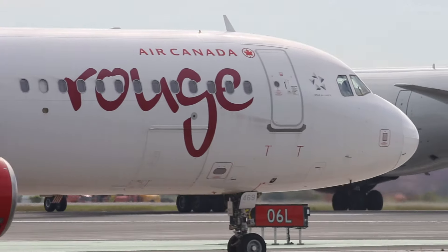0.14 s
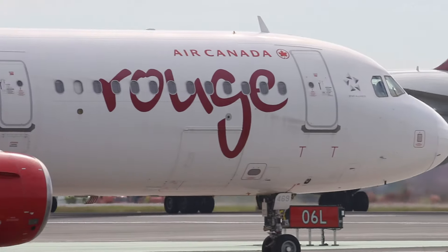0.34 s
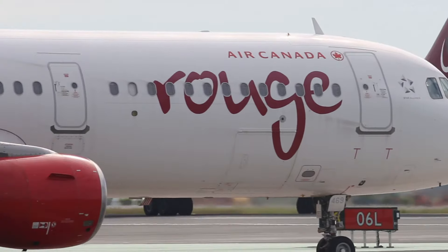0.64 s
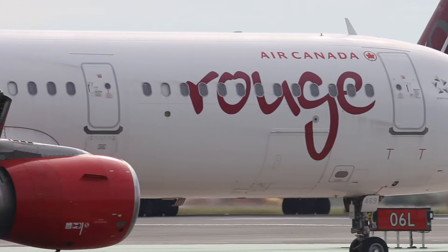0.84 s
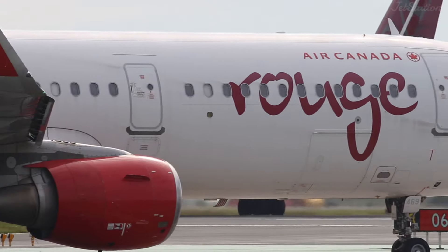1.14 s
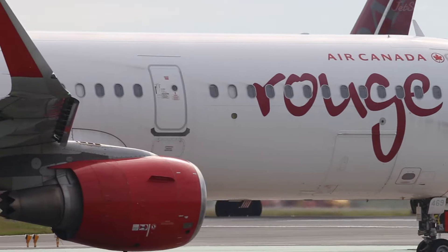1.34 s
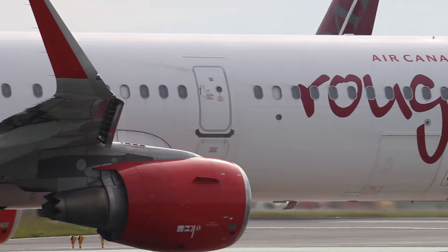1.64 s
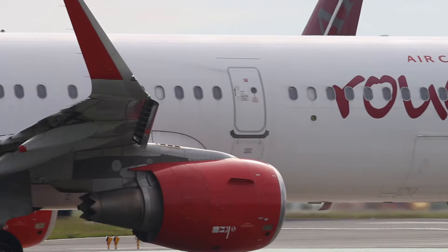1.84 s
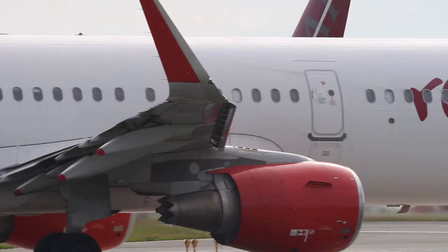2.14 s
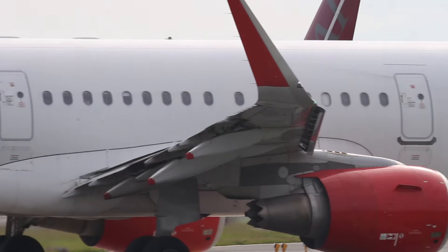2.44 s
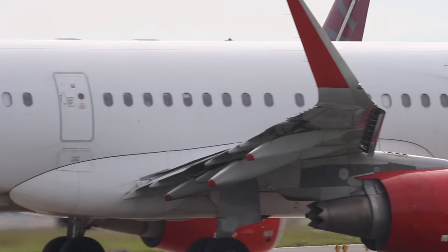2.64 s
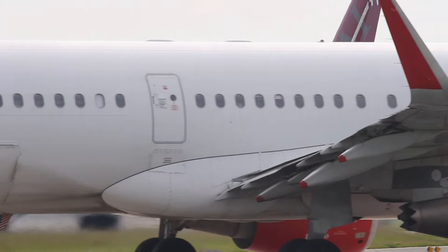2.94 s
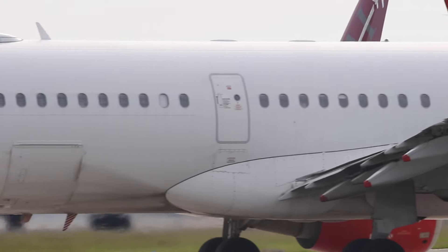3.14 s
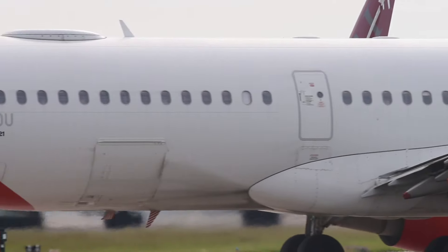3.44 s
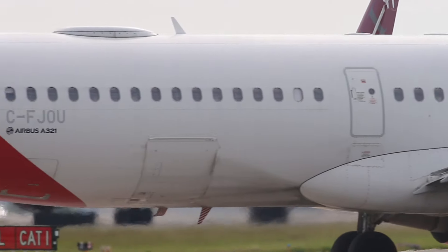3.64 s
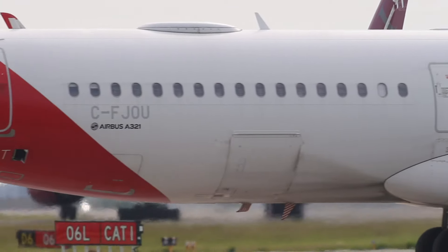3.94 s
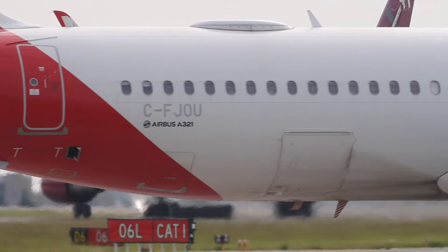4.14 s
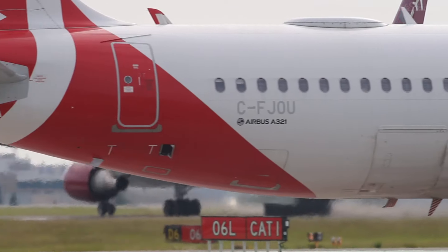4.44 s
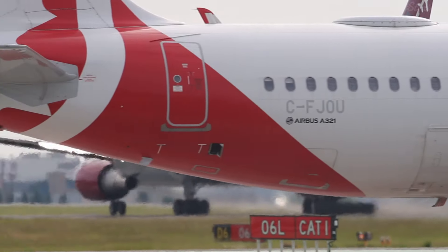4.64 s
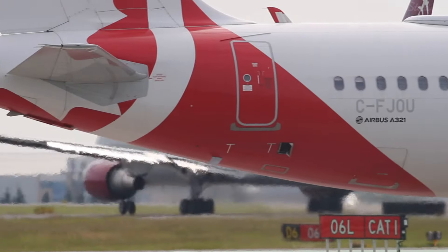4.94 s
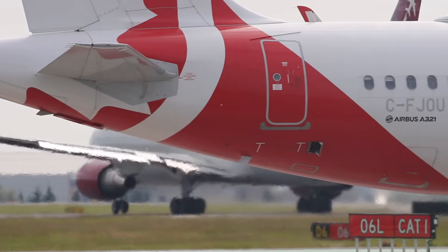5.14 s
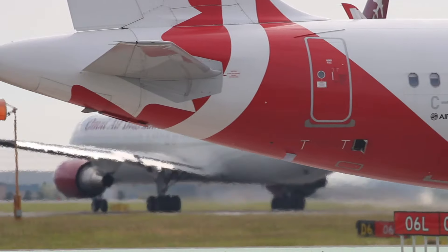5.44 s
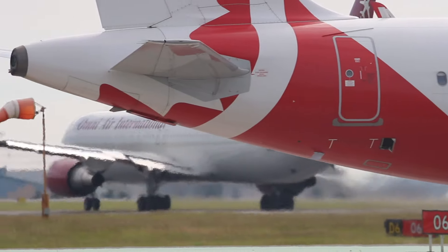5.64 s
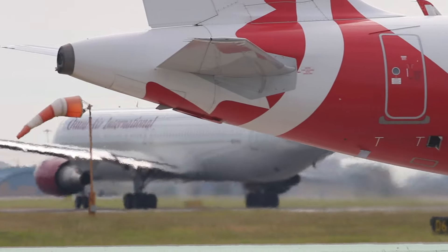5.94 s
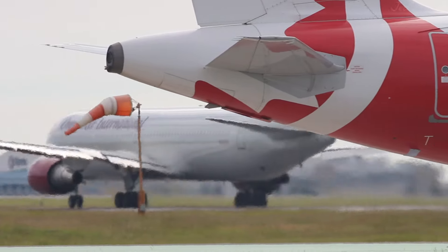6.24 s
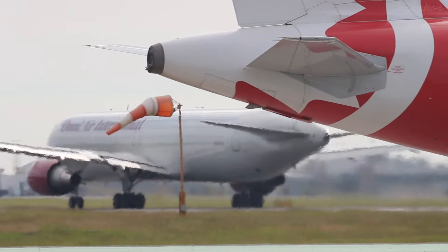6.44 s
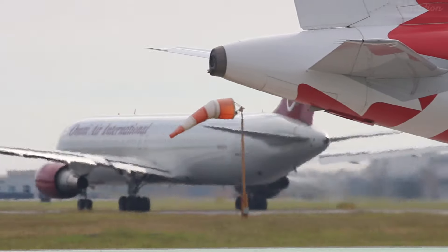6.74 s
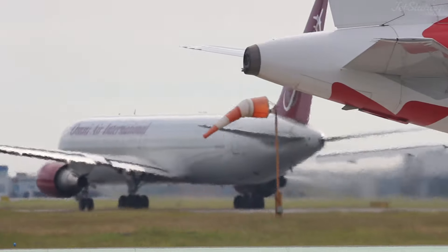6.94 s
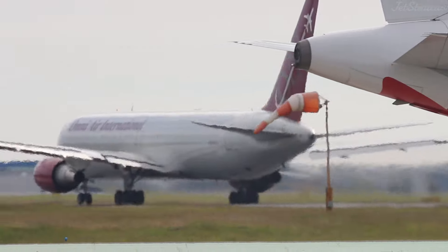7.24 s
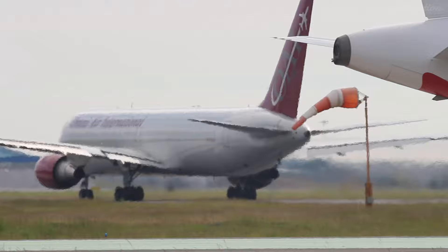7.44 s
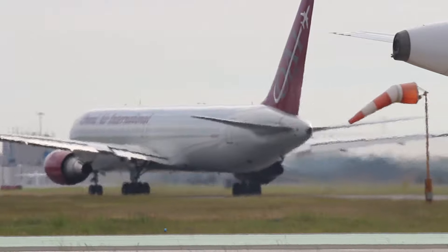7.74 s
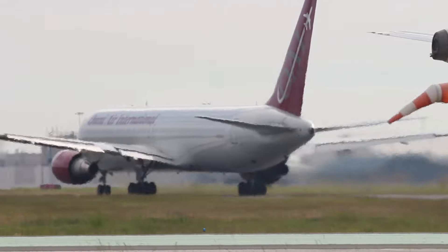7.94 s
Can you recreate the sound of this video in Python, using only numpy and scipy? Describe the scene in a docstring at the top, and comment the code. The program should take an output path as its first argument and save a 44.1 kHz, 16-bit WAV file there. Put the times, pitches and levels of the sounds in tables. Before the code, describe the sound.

Heavy wind buffeting overloads the microphone, thudding hardest in the first three seconds, then a muffled airliner engine roar and thin turbine hiss grow behind it.

```python
"""Airliner engines in gusty wind

Jet roar, noise shaped by spectra, swells and brightens as the nozzles turn this way and the airliner rolls off.
Bright turbine hiss and a thin whine of wavering sine tones ride on top, fading in and out on the wind.
Wind noise rumbles and flutters on the microphone; short noise bursts and pressure bumps are its blows
and pops, and peaks over the recorder's ceiling make its limiter duck everything."""
import sys
import numpy as np
from scipy import signal
from scipy.fft import rfft, irfft, next_fast_len
from scipy.io import wavfile
from scipy.ndimage import uniform_filter1d, minimum_filter1d, map_coordinates

SR = 44100
rng = np.random.default_rng(int(sys.argv[2]) if len(sys.argv) > 2 else 0)


def waveform_to_disk(signal):
    """Save audio, clipped to [-1, 1], as 16-bit WAV at the path in sys.argv[1]."""
    frames = np.transpose(np.atleast_2d(signal))
    scaled = np.clip(frames, -1, 1) * 32767
    samples = np.round(scaled).astype(np.int16)
    wavfile.write(sys.argv[1], SR, samples)


N = 355887  # length in samples

# Steady wind on the microphone, before trims: time_s, rumble_db, flutter_db
WIND_LEVELS = [(0, -13.5, -9.5), (0.17, -21.5, -21.5), (0.4, -17.5, -22), (1.35, -19, -17.5),
               (1.8, -20.5, -22), (2.2, -14, -22), (2.55, -15.5, -21.5), (3.2, -16, -27),
               (3.8, -15.5, -24.5), (4.4, -13, -28), (5.5, -15, -31.5), (6.6, -13.5, -23.5),
               (8.07, -14, -29)]
# Brief gusts of flutter: peak_s, level_db, length_s
FLUTTER_GUSTS = [(0.076, -17, 0.093), (0.33, -19, 0.13), (0.787, -17.5, 0.14), (1.145, -20.5, 0.059),
                 (1.313, -19, 0.15), (1.646, -18.5, 0.027), (2.118, -18.5, 0.058), (2.242, -17.5, 0.043),
                 (2.526, -19.5, 0.28), (2.835, -22, 0.076), (2.987, -18, 0.035), (4.047, -20, 0.16),
                 (4.574, -22.5, 0.047), (4.736, -20.5, 0.25), (5.158, -25.5, 0.044), (5.323, -30.5, 0.048),
                 (6.47, -27, 0.084), (6.617, -23, 0.06), (7.298, -20, 0.055), (7.886, -19, 0.18)]
# Engine levels as the wind carries them over, before trims: time_s, roar_db, hiss_db
ENGINE_LEVELS = [(0.1, -38, -56), (1.18, -37, -54), (1.3, -41.5, -57), (1.65, -39.5, -57.5),
                 (2.0, -36, -53.5), (2.35, -33.3, -52.5), (2.65, -38, -53.5), (3.3, -36.5, -52),
                 (3.5, -34.5, -51.5), (3.75, -31.5, -48.5), (4.05, -30.5, -48), (4.4, -30, -49),
                 (4.75, -29.5, -49), (5.02, -29.7, -47), (5.3, -28, -46.5), (5.5, -29, -47.5),
                 (5.9, -29, -47.3), (6.35, -30, -47), (6.85, -29.5, -48), (7.13, -28, -47),
                 (7.34, -27, -47.5), (7.52, -30, -48), (7.82, -28, -48.5), (8.0, -29, -48)]
# Surges of bright hiss: peak_s, rise_db, half_width_s
HISS_SURGES = [(0.24, 2.5, 0.033), (4.04, 1.5, .08), (4.2, 2.5, 0.081), (4.97, 1.6, 0.11),
               (5.2, 1.3, 0.099), (6.95, 3, 0.069), (7.35, 2, .09)]
# Turbine whine fading in and out on the wind: time_s, level_db
WHINE_LEVELS = [(0.2, -79), (1.5, -85), (1.9, -77), (3.32, -76), (3.52, -64), (3.75, -70), (3.9, -62),
                (4.08, -64.5), (4.23, -57.5), (4.4, -70), (4.8, -71.5), (5.24, -60), (5.48, -66),
                (6.18, -66), (6.36, -62), (6.56, -67), (6.92, -55.5), (7.2, -69), (7.8, -65), (8.0, -66)]
# Blade tones, relative to the whine level: pitch_hz, level_db, start_s, end_s
BLADE_TONES = [(5049, 0, 0, 9), (2247, 6, 5.9, 9), (6127, -11, 6.55, 7.35), (7745, -19, 0, 3.4),
               (10100, -27, 3.6, 6.6), (11740, -33, 0, 9)]
# Single hard eddies, before the trim: start_s, level_db, length_s
HARD_EDDIES = [(0.023, -13.5, 0.04), (0.076, -8, 0.018), (0.119, -7, .011), (0.246, -8, 0.037),
               (0.286, -11, 0.03), (0.364, -8, 0.038), (0.505, -14, 0.018), (0.614, -10.5, 0.022),
               (0.681, -8, 0.031), (0.732, -14, 0.012), (0.753, -9, 0.01), (0.883, -11.5, 0.016),
               (0.942, -11, 0.018), (0.974, -8.5, 0.012), (1.079, -12, 0.026), (1.123, -7.5, 0.012),
               (1.21, -6, 0.028), (1.254, -13.5, 0.021), (1.332, -14, 0.02), (1.359, -10, 0.017),
               (1.395, -11, 0.0084), (1.456, -9.5, 0.011), (1.504, -10, 0.021), (2.476, -13, .014),
               (2.518, -11, 0.011), (2.55, -16, 0.0073), (2.568, -12.5, 0.015), (2.612, -13, 0.012),
               (2.747, -7, 0.013), (2.957, -6, 0.017), (2.99, -16.5, 0.013), (3.036, -15.5, 0.015),
               (3.097, -3, 0.039), (3.208, -6.5, 0.023), (3.34, -8, 0.021), (4.056, -12.5, 0.016),
               (7.287, -13.5, .018), (8.049, -6.5, 0.016)]
# Pressure kicks that pop on the microphone: peak_s, peak_db, half_width_s
PRESSURE_KICKS = [(0.119, -6, 0.0013), (.763, -0.5, 0.0024), (1.22, 0, 0.0017), (2.821, -4, 0.0028),
                  (2.961, -4, 0.0021), (3.115, 7.5, 0.0018), (3.894, 2.5, 0.0024), (7.939, -6, 0.0028),
                  (8.053, -1.5, 0.0011)]

# Wind spectra, only their shape counts (large, small and finest eddies): frequency_hz, density_db
RUMBLE_SPECTRUM = [(8, -11.5), (20, -3.5), (32, 2), (48, -3), (64, -0.5), (88, -10.5), (130, -22),
                   (250, -45), (600, -68), (1500, -120)]
FLUTTER_SPECTRUM = [(40, -29), (90, 4), (140, 0.5), (225, -7), (320, -14.5), (500, -22.5), (1000, -36),
                    (2000, -59), (5000, -110)]
FINE_EDDY_SPECTRUM = [(30, -9.5), (80, 7.5), (200, 1), (300, -6), (420, -9), (600, -19), (1000, -26),
                      (2000, -44.5), (5000, -79), (10000, -120)]
# Exhaust spectra, shape only (from the side, from behind, rolling away): frequency_hz, density_db
SIDE_ROAR_SPECTRUM = [(60, -9.5), (300, 0), (550, 3), (780, -5), (960, 0.5), (1110, -6.5), (1380, -4),
                      (1650, -11), (1780, -8), (1900, -10), (2350, -18), (2600, -16), (3000, -25),
                      (4000, -51), (6000, -84)]
AFT_ROAR_SPECTRUM = [(60, -6), (200, -4.5), (380, -3.5), (520, 0.5), (740, -4), (900, 1), (1020, 1.5),
                     (1180, -5.3), (1340, -2), (1580, -10.5), (1740, -9.5), (1840, -14.5), (2080, -12),
                     (2370, -21), (2630, -16), (3000, -31), (5000, -63)]
AWAY_ROAR_SPECTRUM = [(60, -10), (300, -4), (560, -3), (780, -4.5), (1040, 2), (1200, -6.5), (1340, -1.5),
                      (1800, -15.5), (2150, -15), (2400, -22), (2650, -17.5), (2900, -34), (5000, -60.5)]
# Turbine hiss spectrum, shape only: frequency_hz, density_db
HISS_SPECTRUM = [(1500, -32.5), (2600, -10), (2950, -2), (3150, -2), (3420, 0.8), (3570, -1), (3800, 1.5),
                 (4080, -2), (4330, -1.3), (4650, -6), (4900, -8), (5350, -15), (5750, -18.5), (6800, -23),
                 (7700, -27), (9000, -38), (15000, -45.5)]
# Hard eddy spectrum, shape only: frequency_hz, density_db
BLOW_SPECTRUM = [(30, -11.5), (80, 5), (200, 2.5), (300, -3), (440, -7), (620, -17.5), (1000, -25),
                 (2000, -45), (5000, -78), (10000, -120)]

SWELL_DB, SWELLS_PER_S = 1.12, 7  # the rumble heaves
CHOP_DB, CHOPS_PER_S = 2.5, 16  # the flutter comes in choppy puffs
WAKE_DELAY_S, WAKE_S, WAKE_DEPTH = 0.063, 0.019, 0.84  # the air calms for a moment behind a hard eddy
BREAKUP = 2  # how strongly a gust breaks up the large eddies
TURN_START_S, TURN_END_S = 3.34, 3.82  # the nozzles swing towards the microphone
AWAY_START_S, AWAY_END_S = 6.69, 7.3  # the roar's humps climb as the airliner rolls away
FULL_HISS_DB = -47.5  # hiss level, before the trim, at which the beamed top is left as it is
TOP_HZ = 15700  # the recorder's band limit


def amp(db):
    """Decibels to gain."""
    return 10 ** (np.asarray(db) / 20)


def unit(x):
    """Scale to rms 1."""
    return x / np.sqrt(np.mean(x ** 2) + 1e-20)


def curves(rows):
    """Draw straight lines through each column after the time, one value per sample."""
    times, *columns = np.transpose(rows)
    t = np.arange(N) / SR
    return [np.interp(t, times, column) for column in columns]


def wobble(rate):
    """A smooth random curve with rate knots a second."""
    knots = rng.standard_normal(int(N * rate / SR) + 4)
    return map_coordinates(knots, [np.arange(N) * rate / SR])


def bell(peak, width):
    """A smooth hump of height 1 at peak seconds, down to 1/e at width seconds to each side."""
    return np.exp(-((np.arange(N) / SR - peak) / width) ** 2)


def fade_in(start, end):
    """A straight rise from 0 to 1 between two times."""
    return np.clip((np.arange(N) / SR - start) / (end - start), 0, 1)


def filtered(x, response):
    """Multiply the spectrum of x by a response of frequency."""
    size = next_fast_len(N + SR // 2)
    hz = np.fft.rfftfreq(size, 1 / SR)
    return irfft(rfft(x, size) * response(hz), size)[:N]


def coloured(x, spectrum):
    """Shape x by spectrum points joined on a log frequency axis, at rms 1."""
    points_hz, points_db = np.transpose(spectrum)

    def response(hz):
        return amp(np.interp(np.log(hz + 1), np.log(points_hz + 1), points_db))

    return unit(filtered(x, response))


def patchy(depth_db):
    """White noise whose narrow bands fade in and out, as sound does through turbulent air."""
    bands = signal.stft(rng.standard_normal(N), nperseg=2048)[2]
    across_pitch = uniform_filter1d(rng.standard_normal(bands.shape), size=5, axis=0)
    patches = unit(uniform_filter1d(across_pitch, size=8, axis=1))
    return signal.istft(bands * amp(depth_db * patches), nperseg=2048)[1][:N]


def steadied(x, span):
    """Noise with its swells slower than span seconds evened out."""
    power = uniform_filter1d(x ** 2, max(int(span * SR), 2))
    power = uniform_filter1d(power, max(int(span * SR / 2), 2))
    return unit(x / np.sqrt(np.abs(power) + 1e-3))


def wind(rumble_db=0.96, flutter_db=-2.0, lump_db=4.0, fine_db=-9, fine_onset_db=-20, fine_growth=0.44):
    """Large eddies rumble until a gust breaks them up; small ones flutter in lumps, finer in a stiff breeze."""
    rumble, flutter = curves(WIND_LEVELS)
    breeze = amp(flutter + flutter_db + CHOP_DB * np.tanh(wobble(CHOPS_PER_S)))
    gusts = sum(amp(db) * bell(s, length / 2) for s, db, length in FLUTTER_GUSTS)
    wakes = sum(amp(db) ** 2 * bell(s + WAKE_DELAY_S, WAKE_S) for s, db, _ in HARD_EDDIES)
    flow = np.hypot(breeze, gusts) / (1 + WAKE_DEPTH * wakes)
    heave = amp(rumble + rumble_db + SWELL_DB * wobble(SWELLS_PER_S)) / (1 + BREAKUP * gusts)

    low = steadied(coloured(rng.standard_normal(N), RUMBLE_SPECTRUM), span=0.12)
    coarse = steadied(coloured(rng.standard_normal(N), FLUTTER_SPECTRUM), span=0.037)
    fine = steadied(coloured(rng.standard_normal(N), FINE_EDDY_SPECTRUM), span=0.0081)
    lumps = unit(amp(lump_db * np.tanh(wobble(55))))
    # below the onset, a weaker breeze carries less of the finest flutter
    fine_gain = lumps * amp(fine_db + fine_growth * np.minimum(flutter - fine_onset_db, 0))
    return heave * low + flow * lumps * (coarse + fine_gain * fine)


def jet(aft_db=3.0, away_db=2.0, side_db=5.0, hiss_db=2.0, beam_growth=0.66, beam_hz=4200, waver_db=0.7):
    """Exhaust roar, rippled by the ground reflection, passes from side to aft to away, under turbine hiss."""
    roar, hiss = curves(ENGINE_LEVELS)
    hiss = hiss + sum(db * bell(s, width) for s, db, width in HISS_SURGES)
    aft, away = fade_in(TURN_START_S, TURN_END_S), fade_in(AWAY_START_S, AWAY_END_S)

    side_roar = amp(side_db) * coloured(patchy(depth_db=1.75), SIDE_ROAR_SPECTRUM)
    aft_roar = amp(aft_db) * coloured(patchy(depth_db=0.46), AFT_ROAR_SPECTRUM)
    away_roar = amp(away_db) * coloured(patchy(depth_db=1.2), AWAY_ROAR_SPECTRUM)
    # equal-power crossfades
    behind = np.sqrt(1 - away) * aft_roar + np.sqrt(away) * away_roar
    exhaust = np.sqrt(1 - aft) * side_roar + np.sqrt(aft) * behind

    fizz = coloured(patchy(depth_db=1.77), HISS_SPECTRUM)
    # the highest hiss is the most tightly beamed, so it swells and fades further than the rest
    beamed = filtered(fizz, lambda hz: 1 - 1 / (1 + (hz / beam_hz) ** 20))
    beam_gain = amp(beam_growth * (hiss - FULL_HISS_DB))
    fizz = fizz + (beam_gain - 1) * beamed

    # gusts along the path make roar and hiss waver together
    air = amp(waver_db * wobble(18))
    return air * (amp(roar) * exhaust + amp(hiss + hiss_db) * fizz)


def whine(drift=0.0005, scatter=0.45, flickers_per_s=30):
    """Blade tones waver together in pitch; turbulent air scatters part of each into a quick flicker."""
    t = np.arange(N) / SR
    level, = curves(WHINE_LEVELS)
    # slow and quick pitch drift, as a fraction of the pitch
    speed = 1 + drift * wobble(5) + drift * wobble(70)
    wavering_time = np.cumsum(speed) / SR
    tones = np.zeros(N)
    for hz, db, start, end in BLADE_TONES:
        heard = np.clip(np.minimum(t - start, end - t) / 0.28, 0, 1)  # 0.28 s fades
        scattered = wobble(flickers_per_s) + 1j * wobble(flickers_per_s)
        flicker = unit(np.abs(1 + scatter * scattered))
        tones += heard * amp(db) * flicker * np.sin(2 * np.pi * hz * wavering_time)
    return amp(level) * np.sqrt(2) * tones


def blows(level_db=-1, rise_s=0.0065):
    """A hard eddy is a short burst of low turbulence that swells fast and breaks off."""
    t = np.arange(N) / SR
    force = np.zeros(N)
    for s, db, length in HARD_EDDIES:
        age = np.maximum(t - s + rise_s / 2, 0)  # begins half a rise early
        swell = 1 - np.exp(-(age / rise_s) ** 2)
        break_off = np.exp(-(age / length) ** 4)
        force += amp(db + level_db) * swell * break_off
    return force * steadied(coloured(rng.standard_normal(N), BLOW_SPECTRUM), span=0.025)


def pops():
    """An eddy that strikes the microphone squarely gives one smooth push of pressure."""
    return sum(amp(db) * bell(s, width) for s, db, width in PRESSURE_KICKS)


def scene():
    """Wind and engines at one microphone."""
    return (wind() + jet() + whine() + blows() + pops())[None]


def limiter(x, ceiling=0.93, hold=1100, release_db=150):
    """Peaks over the ceiling pull the gain down; it holds (samples), then recovers by release_db a second."""
    over_db = 20 * np.log10(np.maximum(np.abs(x) / ceiling, 1))
    ramp = release_db * np.arange(N) / SR
    cut_db = np.maximum.accumulate(over_db + ramp) - ramp
    # look 90 samples ahead, so that the smoothed gain is down by the time the peak comes
    gain = minimum_filter1d(amp(-cut_db), size=hold, origin=hold // 2 - 90)
    return x * uniform_filter1d(uniform_filter1d(gain, size=110), size=70)


def record(dry, self_noise_db=-81.0):
    """The recorder limits the peaks, adds its faint hiss and cuts steeply above its band limit."""
    taken = limiter(dry[0]) + amp(self_noise_db) * rng.standard_normal(N)
    low_pass = signal.ellip(10, 0.1, 80, TOP_HZ, fs=SR, output="sos")
    return signal.sosfilt(low_pass, taken)[None]


dry = scene()
out = record(dry)
waveform_to_disk(out)
```